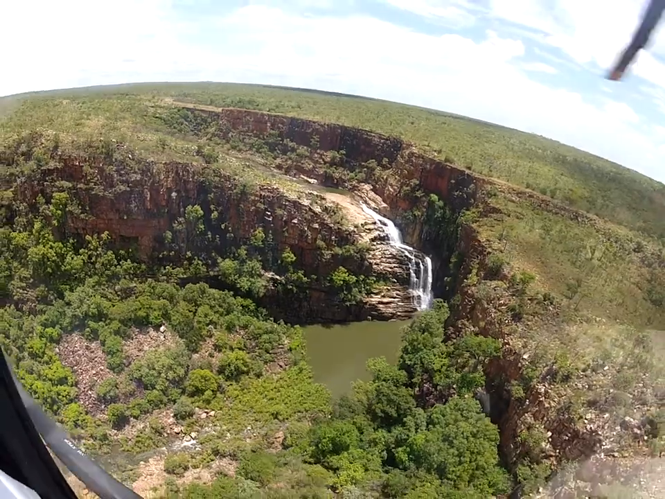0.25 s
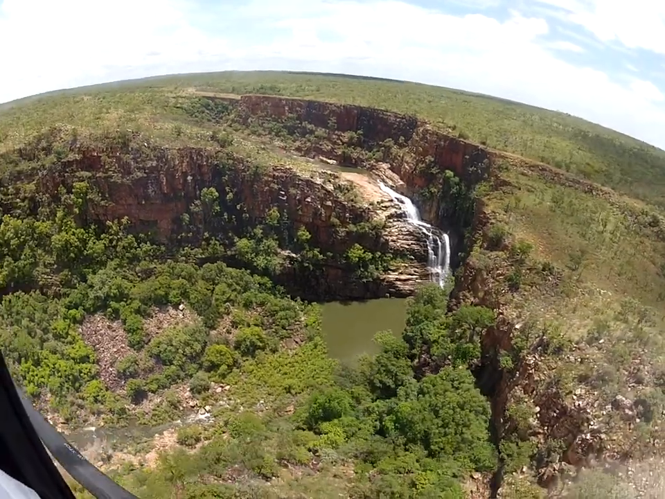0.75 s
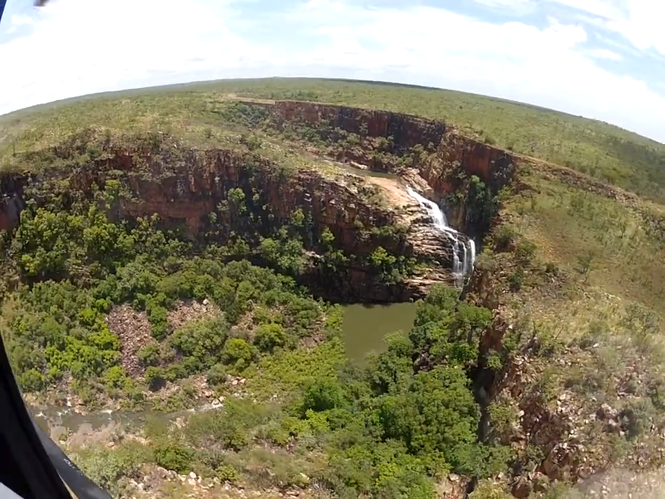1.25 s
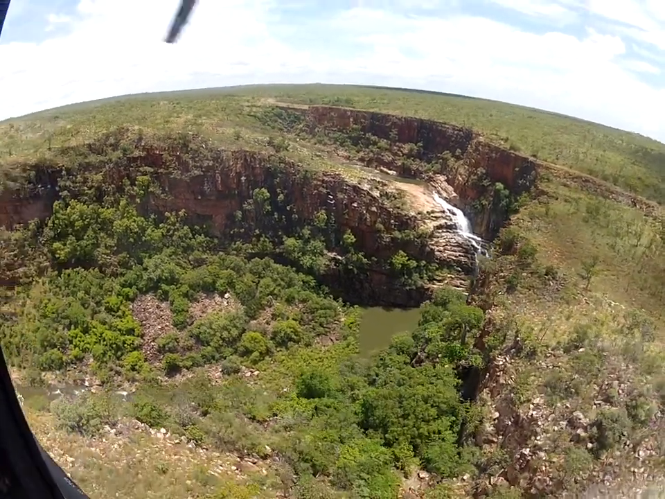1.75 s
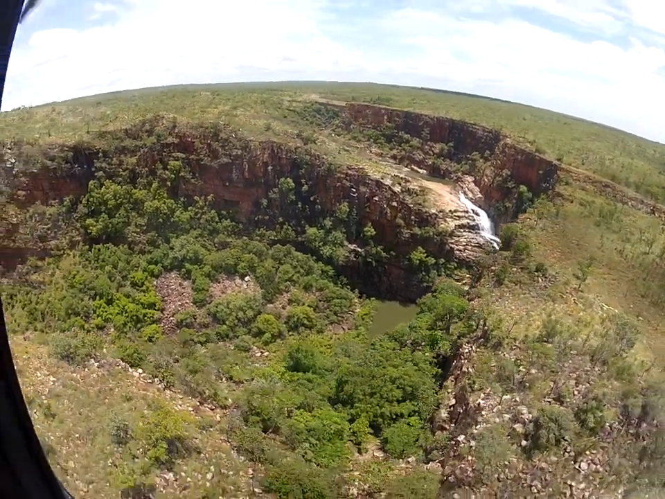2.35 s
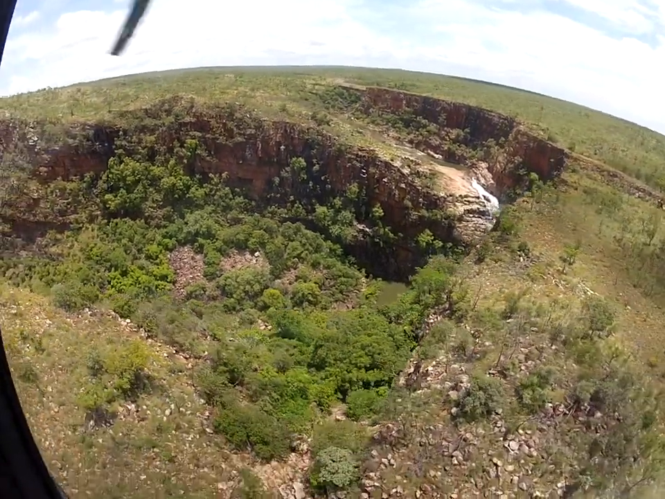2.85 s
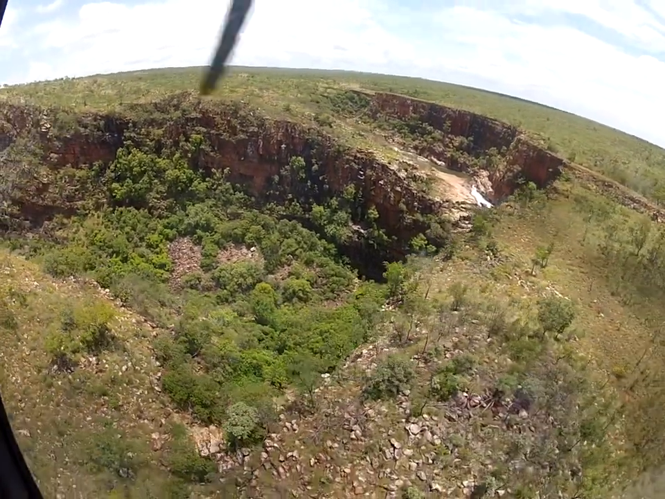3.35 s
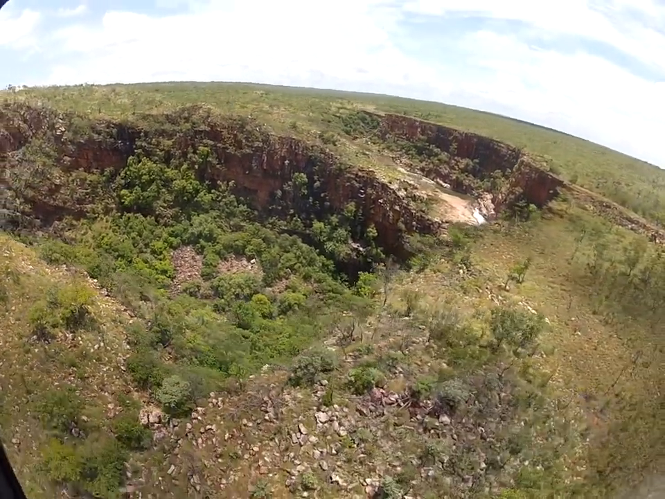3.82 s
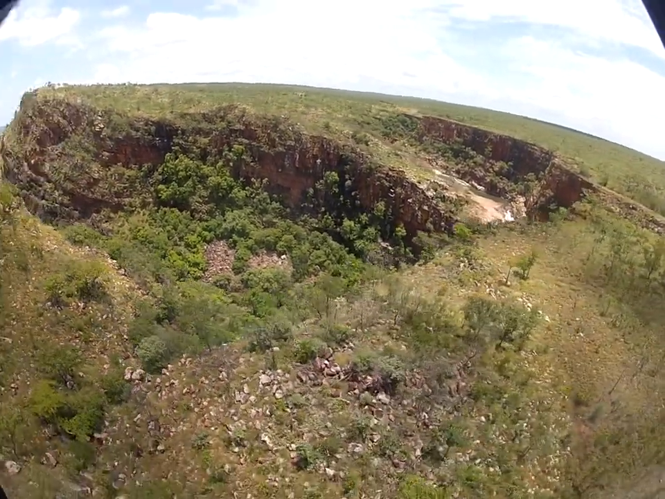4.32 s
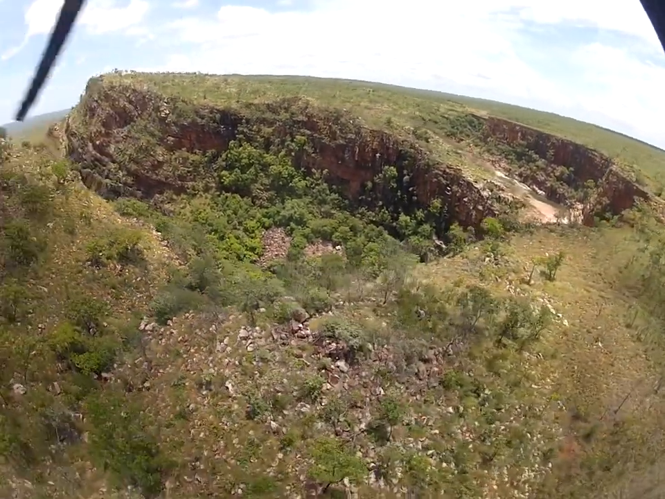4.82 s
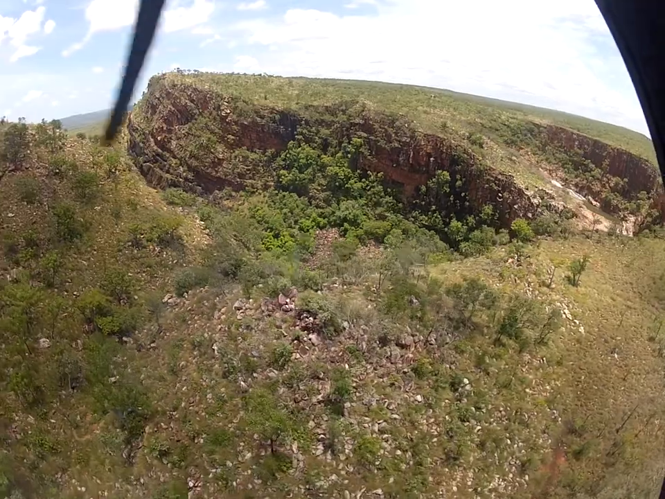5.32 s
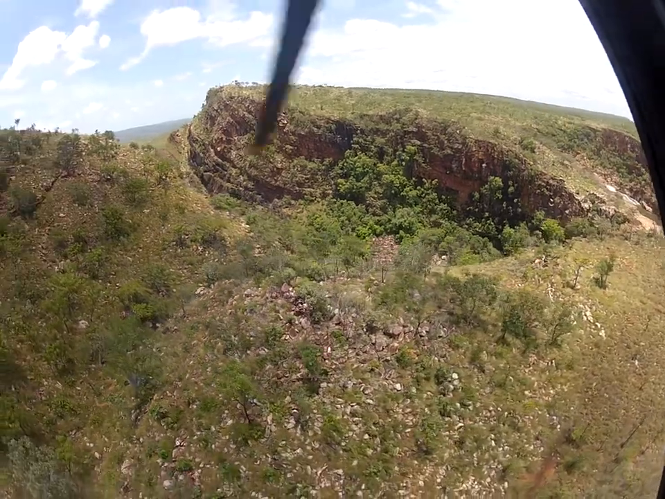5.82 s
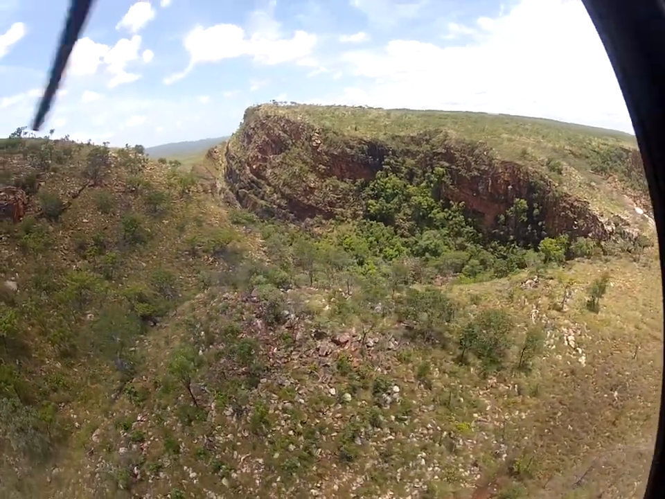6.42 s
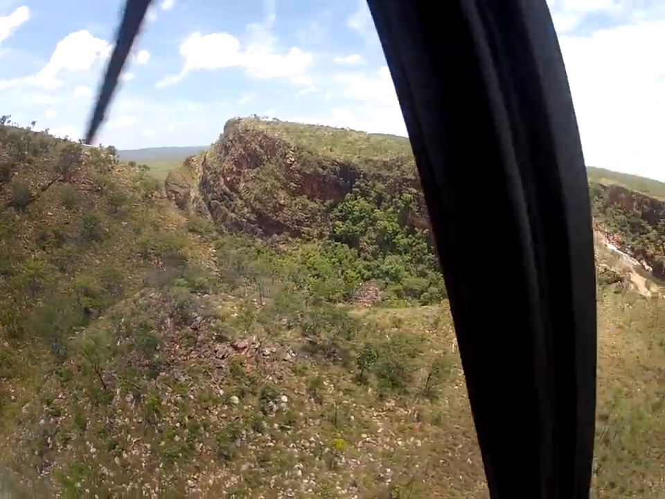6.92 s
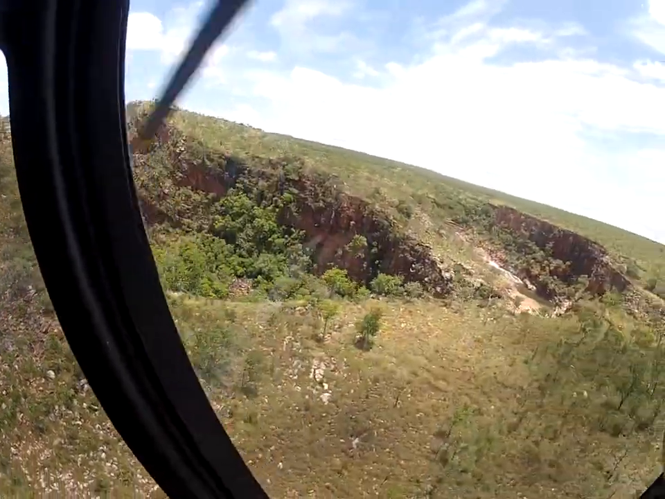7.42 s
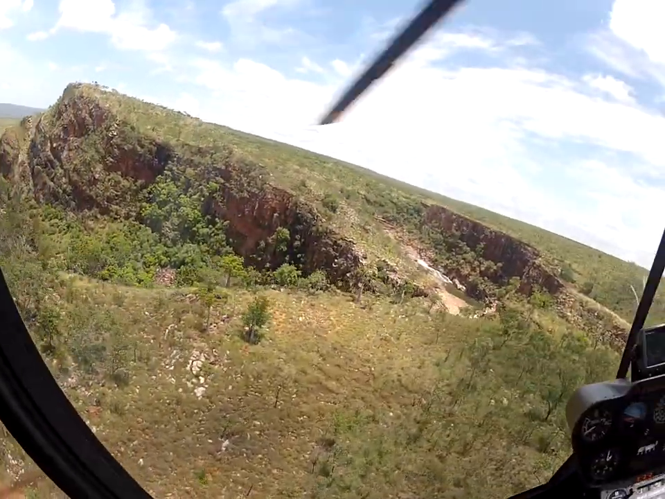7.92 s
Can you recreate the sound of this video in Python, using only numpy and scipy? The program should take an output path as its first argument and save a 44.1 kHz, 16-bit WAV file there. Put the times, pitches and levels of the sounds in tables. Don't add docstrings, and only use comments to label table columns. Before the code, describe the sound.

Loud, droning helicopter cabin: booming engine, rotor whir and rushing air, runs of hard blade slaps, then a sharp knock on the microphone housing.

```python
import sys
import numpy as np
from scipy import signal
from scipy.fft import rfft, irfft, next_fast_len
from scipy.io import wavfile
from scipy.ndimage import uniform_filter1d, map_coordinates

SR = 44100
rng = np.random.default_rng(int(sys.argv[2]) if len(sys.argv) > 2 else 0)


def how_loud(loudness_db):
    steps = np.asarray(loudness_db, float) / 20
    return 10 ** steps


def generate_wav(signal):
    frames = np.transpose(np.atleast_2d(signal))
    scaled = np.clip(frames, -1, 1) * 32767
    pcm = np.round(scaled).astype(np.int16)
    wavfile.write(sys.argv[1], SR, pcm)


N = 360297

FIRINGS_PER_CYCLE, FIRINGS_PER_BLADE = 6, 10

# t/s, level/dB
EXHAUST_BOOM = [(0.0, -20), (0.07, -20.5), (0.84, -18.5), (1.39, -23), (1.43, -28.5), (1.61, -20.5),
                (3.82, -17.5), (4.0, -16), (5.25, -17.5), (5.64, -20.5), (5.71, -28), (5.94, -22),
                (6.17, -23), (6.78, -18.5), (7.33, -19), (7.92, -30), (8.15, -28.5), (8.17, -34)]
# t/s, turn/0 tail..1 nose, lean to seat back/1, draught on the port/dB
CAMERA_MOVES = [(0, 0.099, -0.56, -52), (.6, 0.13, 0.14, -47), (1.5, -0.014, 0.15, -41),
                (1.8, 0.24, 0.59, -40), (2.3, -0.022, 0.74, -38), (2.7, .2, 0.57, -55),
                (3.6, 0.72, 0.33, -51), (4.25, 0.7, -1.5, -49), (4.55, 0.86, 0.14, -56),
                (5.1, 1.3, -0.12, -46), (5.7, 1, -0.77, -47), (6.1, .9, -0.18, -36),
                (6.8, 0.74, -0.15, -38), (7.3, 0.69, -2.6, -38), (7.6, 0.18, -2.5, -37),
                (8.17, 0.76, -2.2, -42)]
# f/Hz, width/Hz, level/dB
CABIN_MODES = [(556, 67, 0), (936, 173, -3), (1131, 97, 1), (1223, 116, 2.5), (1438, 100, -5),
               (1830, 222, -3.5), (2030, 96, 2.5), (2129, 269, -2), (2480, 290, -24), (2910, 160, -18.5),
               (4400, 150, -32)]
# t/s, crack/dB, thump/dB
HARD_SLAPS = [(0.346, -36, -52), (0.423, -31.5, -42), (0.493, -35.5, -46), (0.567, -36, -38.5),
              (0.643, -30.5, -29), (0.715, -37.5, -26), (0.935, -34, -34), (1.454, -36, -22),
              (1.523, -35, -41), (1.597, -35.5, -43), (1.674, -35.5, -33), (2.038, -36.5, -22),
              (2.547, -35.5, -30), (2.626, -36.5, -34), (2.771, -35.5, -38), (2.84, -34.5, -33),
              (2.911, -32, -43.5), (2.984, -35.5, -30), (3.498, -35.5, -28), (5.757, -38, -20),
              (5.911, -32.5, -32), (5.988, -30.5, -31), (6.058, -33.5, -29), (6.13, -30, -15),
              (6.198, -27.5, -15), (6.27, -27.5, -17.5), (6.341, -30, -24.5), (6.638, -31.5, -28),
              (6.707, -29, -25), (6.783, -32.5, -31)]
# t/s, level/dB
HOUSING_SNAP = (7.7144, 0.76)


def unit(x):
    return x / np.sqrt(np.mean(x ** 2) + 1e-20)


def curves(rows):
    s, *cols = np.transpose(rows)
    t = np.arange(N) / SR
    return [np.interp(t, s, c) for c in cols]


def knots(rate_hz):
    return rng.standard_normal(int(N * rate_hz / SR) + 4)


def wobble(rate_hz):
    coarse = np.arange(0, N + 64, 64)
    return np.interp(np.arange(N), coarse, map_coordinates(knots(rate_hz), [coarse * rate_hz / SR]))


def filtered(x, response):
    m = next_fast_len(N + SR // 2)
    return irfft(rfft(x, m) * response(np.fft.rfftfreq(m, 1 / SR)), m)[:N]


def colour(points):
    hz, db = np.transpose(points)
    return lambda f: how_loud(np.interp(np.log(f + 1), np.log(hz + 1), db))


def resonances(modes):
    def response(f):
        return sum((-1) ** k * how_loud(db) * 1j * f * w / (c * c - f * f + 1j * f * w)
                   for k, (c, w, db) in enumerate(modes))
    return response


def noise(response):
    return unit(filtered(rng.standard_normal(N), response))


def patchy(x, depth_db):
    z = signal.stft(x, nperseg=1024)[2]
    field = uniform_filter1d(rng.standard_normal(z.shape), size=5, axis=0)
    field = uniform_filter1d(field, size=9, axis=1)
    return unit(signal.istft(z * how_loud(depth_db * unit(field)), nperseg=1024)[1][:N])


def bursts(times_s, levels_db, rise_s, t60_s):
    t = np.arange(SR // 10) / SR
    starts = np.bincount(np.round(np.multiply(times_s, SR)).astype(int), how_loud(levels_db), N)
    return signal.fftconvolve(starts, (1 - np.exp(-t / rise_s)) * how_loud(-60 * t / t60_s))[:N]


def lines(turns, table, drift_db, sway_rad, rate_hz):
    at, coarse = np.arange(0, N, 4), np.arange(0, N + 256, 256)
    total = np.zeros(len(at))
    for multiple, db in table:
        drift, phase = (map_coordinates(knots(rate_hz), [coarse * rate_hz / SR]) for _ in range(2))
        line_db = np.broadcast_to(db, N)[np.minimum(coarse, N - 1)]
        gain = np.interp(at, coarse, how_loud(line_db + 4 + drift_db * drift))
        angle = 2 * np.pi * (multiple * turns[at] + rng.random())
        total += gain * np.sin(angle + sway_rad * np.interp(at, coarse, phase))
    return signal.resample_poly(total, 4, 1)[:N]


def wake():
    starts = np.bincount(np.round(np.transpose(HARD_SLAPS)[0] * SR).astype(int), minlength=N)
    span = round(1 * SR / 2)
    stir = uniform_filter1d(uniform_filter1d(starts * 1., span), span)
    return stir / stir.max()


def machinery(firings):
    # multiple of the six-firing cycle/1, level/dB
    engine_lines = [(3, -49), (5, -47), (7, -42.5), (8, -46.5), (9, -41), (10, -59), (15, -61), (21, -71),
                    (24, -58.5), (30, -63), (36, -59), (39, -85), (42, -64.5), (50, -68), (52, -63.5),
                    (53, -68), (54, -63.5), (56, -63), (60, -66), (62, -73), (75, -65.5), (78, -65.5)]
    # multiple of the blade rate/1, level/dB
    rotor_lines = [(1, -63), (2, -57), (3, -60.5), (4, -52), (6, -52.5), (7, -65.5), (8, -63), (9, -43),
                   (11, -41.5), (13, -46.5), (14, -51), (19, -65), (21, -54), (23, -52.5), (24, -56.5),
                   (27, -58)]
    # multiple of the firing rate/1, level/dB
    geared_lines = [(1.193, -48), (3.367, -56), (3.853, -66), (5.693, -70), (6.705, -77), (8.54, -62)]
    overtone_multiples = [
        2,
        3,
        2.853,
        8,
        16.107,
    ]
    # facing the tail/dB, gain by turning/dB, by leaning/dB, follow/dB per dB of boom
    overtone_levels = [
        (-40, 0.4, 7.5, -0.15),
        (-48, 3.5, 0.9, .5),
        (-47.5, 1, -0.3, .5),
        (-68, 11, -2, 0.9),
        (-57.5, -3, 1.5, -0.5),
    ]
    boom_db, = curves(EXHAUST_BOOM)
    turn, lean, _ = curves(CAMERA_MOVES)
    flutter_db = .5 * np.cos(2 * np.pi * firings / FIRINGS_PER_BLADE) + 0.25 * wobble(14)
    boom = np.sqrt(2) * how_loud(boom_db + flutter_db) * np.sin(2 * np.pi * firings)

    swell_db = boom_db - boom_db.mean()
    heard_db = [db + turn_db * turn + lean_db * lean + follow * swell_db
                for db, turn_db, lean_db, follow in overtone_levels]
    strong = list(zip(overtone_multiples, heard_db))
    overtones = lines(firings, strong[:3], drift_db=2.4, sway_rad=0.6, rate_hz=11)
    overtones = overtones + lines(firings, strong[3:], drift_db=3, sway_rad=1.54, rate_hz=14)

    engine = lines(firings / FIRINGS_PER_CYCLE, engine_lines, drift_db=3, sway_rad=0.95, rate_hz=5)
    rotor = lines(firings / FIRINGS_PER_BLADE, rotor_lines, drift_db=3.5, sway_rad=0.78, rate_hz=2.1)
    geared = lines(firings, geared_lines, drift_db=4.0, sway_rad=0.73, rate_hz=3.3)
    weak = how_loud(2.7 * wake() - 1.0) * engine + rotor + geared
    return boom + how_loud(-1.35) * overtones + how_loud(0.062 * (boom_db + 23)) * weak


def roar(firings):
    # f/Hz, level/dB per Hz
    buffet_colour = [(12, -40), (25, -9), (50, 6.5), (90, -1), (130, -15), (200, -74)]
    # f/Hz, level/dB per Hz
    body_colour = [(60, -44), (100, 0.5), (150, -2.5), (210, 0.5), (300, -1.5), (400, -7.5), (480, -9),
                   (650, -34.5), (1000, -65)]
    # f/Hz, level/dB per Hz
    hiss_colour = [(1500, -48), (2600, -3), (3500, -4), (4400, -3), (5000, -1.5), (5500, -14), (6000, -15),
                   (7000, -22)]
    # f/Hz, width/Hz, level/dB
    whistle_modes = [(3090, 90, 0.5), (4300, 300, -6.5)]
    turn, lean, buffet_db = curves(CAMERA_MOVES)
    boom_db, = curves(EXHAUST_BOOM)
    stir = wake()
    body_db, roar_db = -36.5 + 4 * stir, -43 + 0.29 * stir
    gust = np.exp(-((np.arange(N) / SR - 3.58) / .33) ** 2)
    hiss_db = -57.5 + 2.5 * gust + .6 * lean + .2 * (boom_db - boom_db.mean())
    whistle_db = -68 + 5.5 * turn
    blade = np.cos(2 * np.pi * (firings / FIRINGS_PER_BLADE + 0.045))
    firing = np.cos(2 * np.pi * (firings + 0.27))

    buffet = how_loud(buffet_db - 3.0 + 0.4 * wobble(3.2)) * noise(colour(buffet_colour))
    body = how_loud(body_db + 1.0 * blade + 0.87 * wobble(9)) * noise(colour(body_colour))
    shell_gain = how_loud(roar_db + 0.33 * blade + .5 * firing + 0.23 * wobble(12))
    shell = shell_gain * patchy(noise(resonances(CABIN_MODES)), depth_db=0.62)
    hiss_gain = how_loud(hiss_db + 0.17 * blade + 0.29 * wobble(11))
    hiss = hiss_gain * patchy(noise(colour(hiss_colour)), depth_db=1.8)
    whistle = how_loud(whistle_db + 2.5 * wobble(6)) * noise(lambda f: resonances(whistle_modes)(f) ** 2)
    return buffet + body + shell + hiss + whistle


def passes(firings):
    first_pass = .74
    at = np.flatnonzero(np.diff(np.floor(firings / FIRINGS_PER_BLADE - first_pass)))
    size_db = 7 * wake()[at, None] + 1.8 * rng.standard_normal((120, 2))[:len(at)]
    soft = np.column_stack([at / SR, size_db + [-45, -47.5]])
    free = np.abs(soft[:, :1] - np.transpose(HARD_SLAPS)[0]).min(axis=1) > .03
    return np.vstack([HARD_SLAPS, soft[free]])


def slaps(firings):
    # f/Hz, width/Hz, level/dB
    slap_modes = [(191, 52, 1), (408, 43, -4.5), (594, 46, -1.5), (840, 46, -7.5), (1206, 126, -8),
                  (1743, 90, -9), (2200, 300, -14.5), (3180, 500, -28)]
    # t/s, level/dB
    echoes = [(0, 1), (.003, -0.5), (.0062, -2.5), (.0095, -4), (.013, -5.5), (.017, -7)]
    s, crack_db, thump_db = np.transpose(passes(firings))
    scatter = rng.standard_normal((150, len(echoes), 2))[:len(s)]
    pulses = np.zeros((2, N + SR))
    for k, (lag_s, db) in enumerate(echoes):
        at = np.round((s + 0.001997 + lag_s + 0.001144 * scatter[:, k, 0]) * SR).astype(int)
        pulse_db = np.array([thump_db + 40.0, crack_db + 43.5]) + db + 2.5 * scatter[:, k, 1]
        pulses[:, at] -= how_loud(pulse_db)
    blunt = lambda f: 1 / (1 + 1j * f / 2600) ** 2
    thump = filtered(pulses[0, :N], lambda f: blunt(f) * resonances(slap_modes[:1])(f))
    crack = filtered(pulses[1, :N], lambda f: blunt(f) * resonances(slap_modes[1:])(f))
    puff = bursts(s, crack_db + .4, rise_s=0.0062, t60_s=0.057) * noise(resonances(CABIN_MODES))
    return thump + crack + puff


def housing():
    # t/s, level/dB
    ticks = [
        (5.301, -50.5),
        (6.013, -38),
        (6.225, -48),
        (7.85, -36),
        (7.953, -46.5),
    ]
    # f/Hz, level/dB, t60/s
    housing_modes = [(900, -10.5, 0.025), (1220, -6, 0.015), (1820, 0.5, 0.013), (3080, -20, .008),
                     (4760, -1.5, 0.0042)]
    snap_s, snap_db = HOUSING_SNAP
    t = np.arange(SR // 20) / SR
    u = t / 0.00094
    push = -1.7 * u * (1 - 0.48 * u) * np.exp(-u * 0.68)
    ring = sum(how_loud(db - 60 * t / t60_s) * np.cos(2 * np.pi * hz * (t - .0009))
               for hz, db, t60_s in housing_modes)
    snap = np.zeros(N)
    onset = 1 - np.exp(-(t / 0.00061) ** 2)
    snap[round(snap_s * SR):][:len(t)] = how_loud(snap_db) * (push + ring * onset)
    times_s, levels_db = np.transpose(ticks)
    rattle = noise(colour([(1200, -49), (2200, 4), (3100, 11.5), (4500, 3.5), (5800, 4.0), (7000, -27)]))
    return snap + bursts(times_s, levels_db - 0.5, rise_s=0.00049, t60_s=0.073) * rattle


def scene():
    # t/s, firing rate f/Hz
    firing_rate = [(0, 136.5), (1.5, 136.5), (2.2, 136.75), (3.5, 136.75), (4.5, 136.9), (5.5, 137.1),
                   (6.5, 137.1), (8.17, 136.6)]
    firings = np.cumsum(curves(firing_rate)[0]) / SR
    mono = machinery(firings) + roar(firings) + slaps(firings) + housing()
    return np.array([mono, mono])


def roll_off(x):
    return signal.sosfilt(signal.butter(12, 16540, fs=SR, output="sos"), x)


def record(dry):
    after_s = np.maximum(np.arange(N) / SR - HOUSING_SNAP[0], 0)
    duck = how_loud(-12 * (1 - np.exp(-(after_s / .006) ** 2)) * np.exp(-after_s / .022))
    coarse = signal.resample_poly(dry[0] * duck, 40, 147)
    held = np.repeat(np.clip(coarse, -1, 1), 4)
    held = signal.resample_poly(held, 147, 160)[:N]
    top_band = filtered(held, lambda hz: hz > 15290)
    quiet = uniform_filter1d(top_band ** 2, size=200) < how_loud(-95)
    shrill = filtered(top_band, lambda hz: np.clip((hz - 16000) / 500, 0, 1))
    u = np.maximum(after_s - .003, 0) / 0.0016
    settle = -.27 * u * np.exp(-u) + 0.038 * (1 - np.exp(-u / 4)) * np.exp(-(u / 15) ** 6)
    mix = np.clip(held - np.where(quiet, top_band, shrill) + np.array([settle, -settle]), -1, 1)
    return roll_off(mix)


dry = scene()
out = record(dry)
generate_wav(out)
```